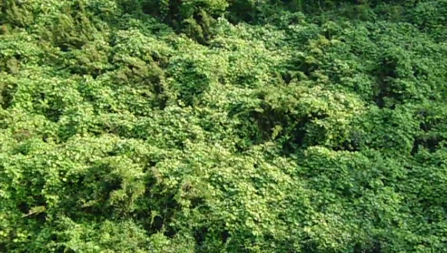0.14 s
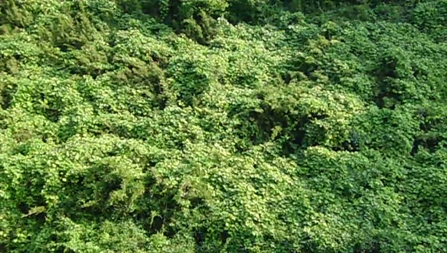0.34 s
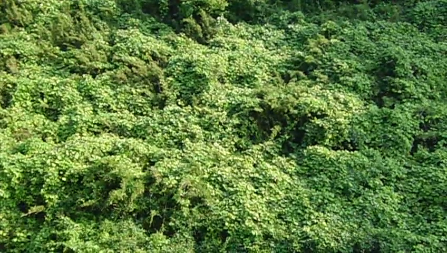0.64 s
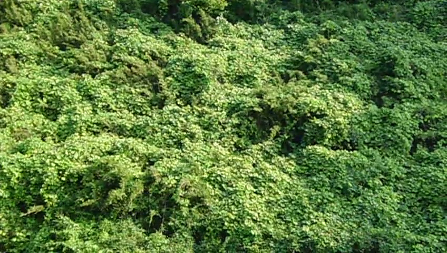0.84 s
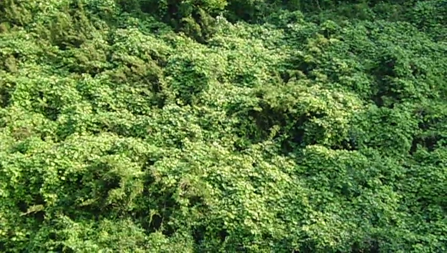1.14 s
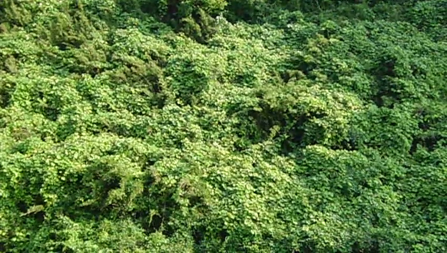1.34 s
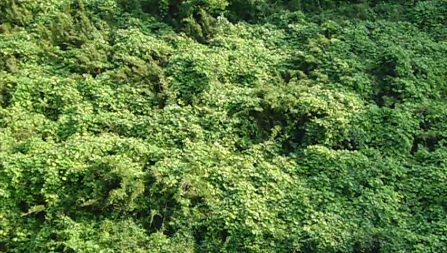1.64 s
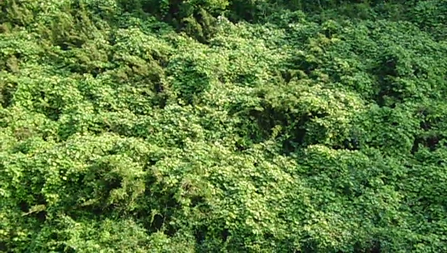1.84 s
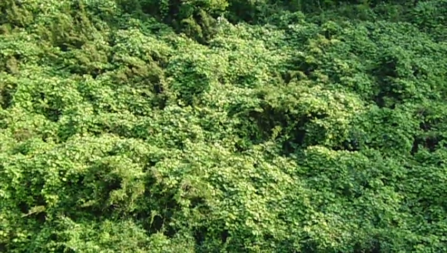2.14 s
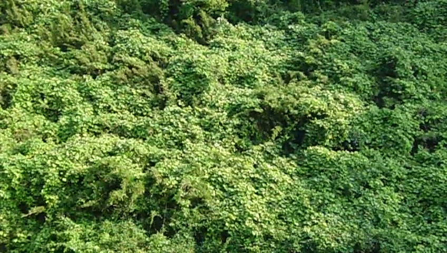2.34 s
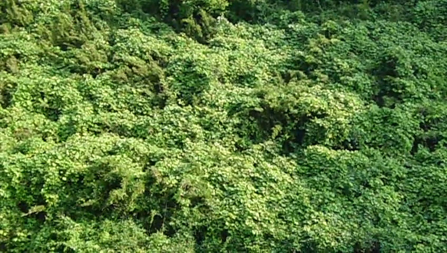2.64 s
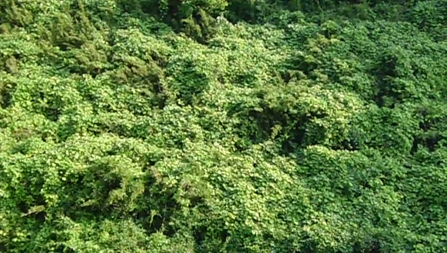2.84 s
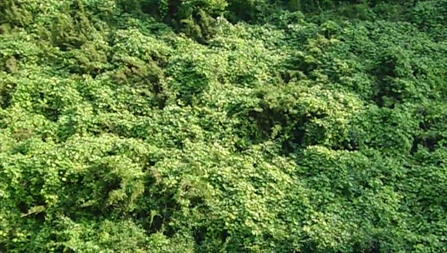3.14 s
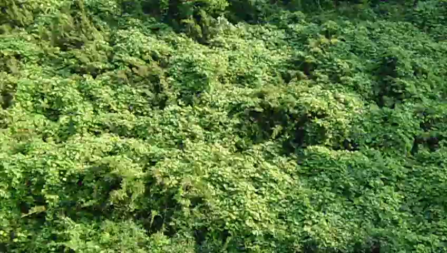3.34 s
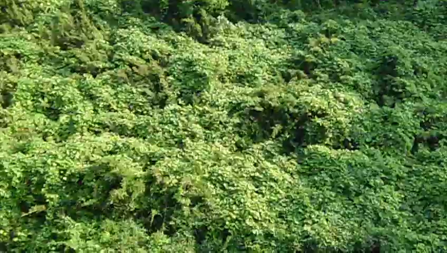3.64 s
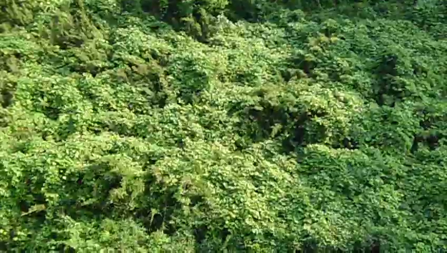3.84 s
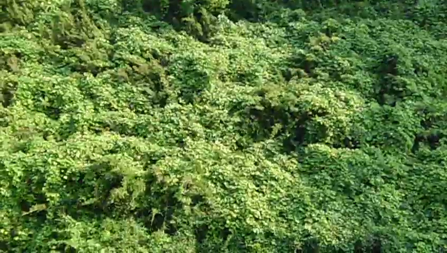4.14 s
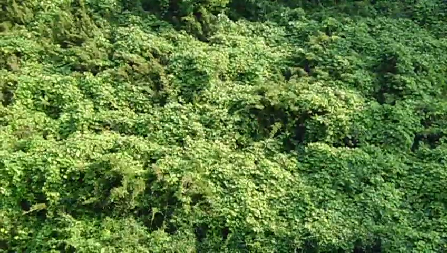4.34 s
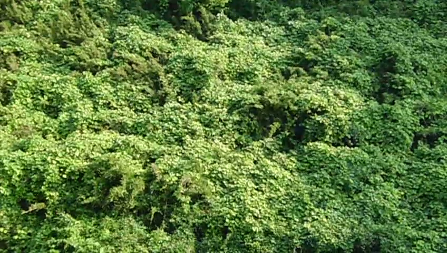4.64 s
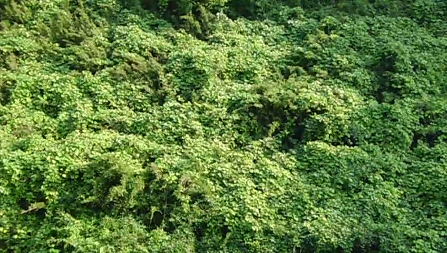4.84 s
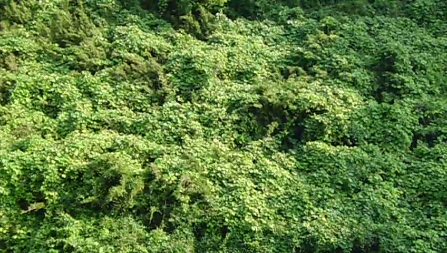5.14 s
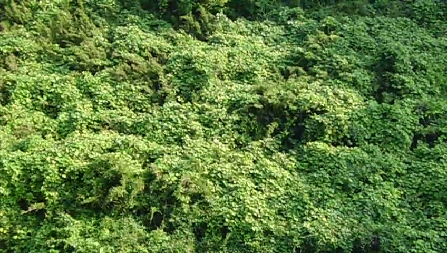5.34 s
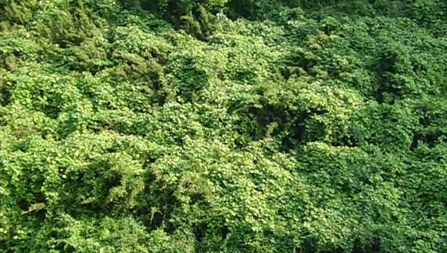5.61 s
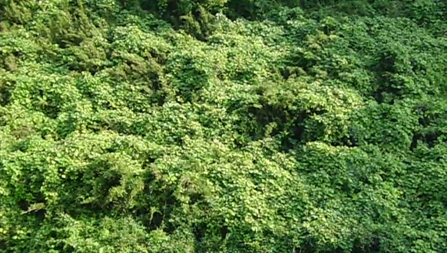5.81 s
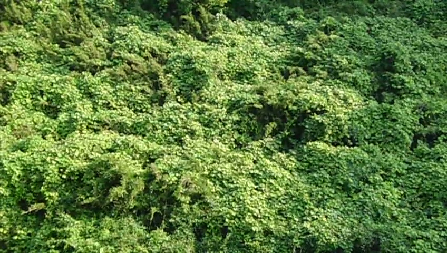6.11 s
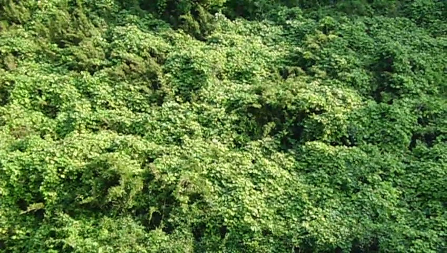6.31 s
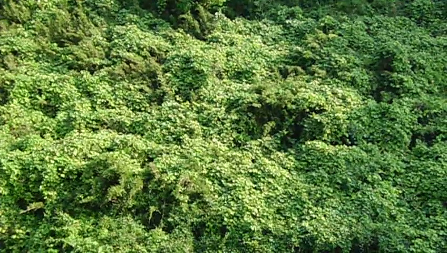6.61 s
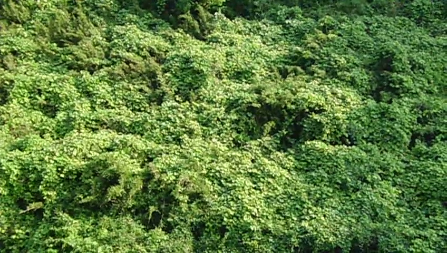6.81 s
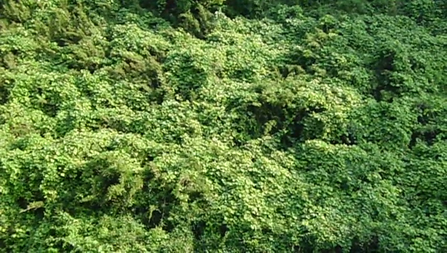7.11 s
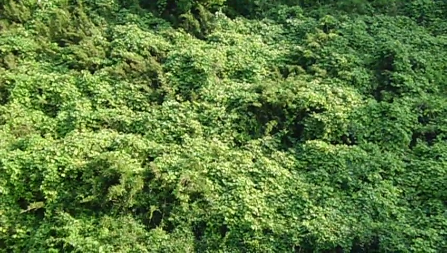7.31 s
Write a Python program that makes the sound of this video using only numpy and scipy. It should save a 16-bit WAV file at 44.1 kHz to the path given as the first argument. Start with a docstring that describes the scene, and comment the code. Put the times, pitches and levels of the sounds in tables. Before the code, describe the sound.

Many cicadas ring together from the start, high and metallic, with a hissing insect buzz shivering above them. Thin fuzzy whines join after two seconds, and two tiny dry ticks pass. Midway one bird gives a soft, held whistle ending in a sharp flick that rings along the leafy slope. The chorus then thins and grows more distant. Quiet mono outdoor pickup, with faint wind rumble below.

```python
"""Evening cicadas on an overgrown hillside, from the first moment: click trains ringing as short tonal notes,
about eight a second, under a high insect buzz of noise throbbing 32 times a second. Thin fuzzy whines come in
from 2 s, with two dry damped ticks near 2.8 and 4.2 s. A warbler's sine whistle swells from 2.95 s and flicks
up and down at 3.7 s. The slope echoes cicadas and bird; wind noise and a swelling low drone lie beneath."""
import sys
import numpy as np
from scipy import signal
from scipy.fft import rfft, irfft, next_fast_len
from scipy.io import wavfile
from scipy.ndimage import uniform_filter1d, map_coordinates

SR = 44100
rng = np.random.default_rng(int(sys.argv[2]) if len(sys.argv) > 2 else 0)


def wav_record(signal):
    """Record a signal, one row per channel, as 16-bit PCM in the file named by sys.argv[1]."""
    frames = np.transpose(np.atleast_2d(signal))
    bounded = np.clip(frames, -1, 1)
    # unit amplitude maps onto the largest positive 16-bit level
    quanta = np.round(bounded * 32767).astype(np.int16)
    wavfile.write(sys.argv[1], SR, quanta)


N = 329427
T = np.arange(N) / SR  # seconds


def cicadas():
    """Clear notes carry some echo; distant singers arrive mostly as echo off the slope."""
    near = sing(near_notes(), column=1, rough=0.0014, sag=0.011, rasp_db=-17.0)
    far = sing(far_notes(), column=2, rough=0.0038, sag=0.011, rasp_db=-17.5)
    near_mix = near + amp(-8.5) * slope(near, t60=0.61)
    far_mix = amp(-6) * far + amp(-4) * slope(far, t60=1.0)
    return (near_mix + far_mix)[SR:]  # drop the one-second lead-in


# Clear cicada notes, one pitch line per table, given by marker notes; some lines are further partials
# sounding in step with another line.
# Each row: note end in seconds, resonance in Hz, level in dB before scatter and swell.
NEAR_LINES = [
    [(.133, 4060, -63.5), (.608, 4055, -59.5), (.989, 4040, -57.5), (1.488, 4058, -57),
     (2.114, 4054, -57.5), (2.749, 4040, -56), (3.144, 4028, -54), (3.539, 4012, -57), (3.982, 4035, -58)],
    [(3.11, 4300, -72), (3.373, 4386, -63), (3.707, 4400, -58.5), (3.824, 4380, -63)],
    [(3.513, 4600, -70), (3.758, 4680, -63), (4.0, 4800, -76), (4.25, 4640, -72)],
    [(3.513, 4930, -69), (3.758, 5020, -67), (4.0, 5000, -68)],
    [(3.513, 4425, -64), (3.758, 4390, -64), (4.106, 4326, -54.5), (4.48, 4306, -60.5), (4.965, 4290, -59),
     (5.509, 4287, -60), (5.926, 4353, -61.5)],
    [(4.285, 4020, -60.5), (4.692, 4080, -67), (5.183, 4040, -72)],
    [(4.507, 4370, -65), (4.896, 4375, -62), (5.149, 4308, -62), (5.421, 4190, -68)],
    [(4.198, 3870, -72), (4.66, 3870, -68), (5.016, 3905, -65), (5.544, 3890, -69), (5.924, 3850, -66.5),
     (6.297, 3850, -72), (6.79, 3865, -73), (7.341, 3890, -69)],
    [(4.66, 3730, -75), (5.544, 3740, -70), (6.297, 3726, -74.5), (7.341, 3740, -77)],
    [(5.119, 4117, -75), (5.371, 4128, -68)],
    [(6.115, 4280, -64), (6.398, 4347, -67), (6.78, 4300, -76), (7.27, 4290, -75)],
    [(6.297, 3980, -77), (6.917, 4020, -72), (7.3, 3970, -76)],
]
NOTES_PER_S, NOTE_SCATTER_DB = 7.7, 0.56  # approximate pace; random level spread


def near_notes():
    """Each pitch line fills the time between marker notes evenly; rows are (end s, Hz, dB)."""
    lines = []
    for markers in NEAR_LINES:
        s, hz, db = np.transpose(markers)
        number = np.cumsum(np.round(np.diff(s, prepend=s[0]) * NOTES_PER_S))
        every = np.arange(number[-1] + 1)
        note_end = np.interp(every, number, s)
        note_hz = np.interp(every, number, hz)
        scatter_db = NOTE_SCATTER_DB * rng.standard_normal(len(every))
        note_db = np.interp(every, number, db) + scatter_db
        lines.append(np.transpose([note_end, note_hz, note_db]))
    return np.concatenate(lines)


# Distant phrases, before random spread, soft opening and the far mix gains.
# Each row: start in seconds, end in seconds, notes per second, opening and last pitch in Hz, level in dB.
FAR_SINGERS = [(-0.68, 3.2, 8.6, 4200, 3700, -71.5), (-0.67, .8, 8.85, 4800, 4140, -69.5),
               (-0.9, 1.56, 8.1, 4000, 4320, -66), (-.7, .7, 8, 4150, 4100, -61.5),
               (0.65, 3.5, 8.2, 4420, 4380, -74.5), (0.77, 2.4, 6.9, 4230, 4100, -70),
               (2.5, 6.2, 8.9, 4300, 4240, -71), (2.5, 6.5, 7.5, 4404, 4100, -63.5),
               (3, 6.13, 8.6, 4200, 4290, -62), (3, 5.75, 9, 4460, 4370, -60),
               (3.5, 6.8, 7.7, 4130, 4060, -58.5), (3, 7.2, 8.86, 3930, 3850, -69),
               (3.5, 8.17, 7.8, 3780, 4000, -78.5), (4, 7.47, 7.5, 4350, 4260, -62),
               (5.5, 6.8, 7.6, 4400, 3830, -81), (6, 7.65, 7.7, 4000, 3800, -69.5),
               (4.2, 5.6, 8.2, 4970, 4930, -75)]


def far_notes():
    """Each phrase opens low and soft, glides to its last pitch and fades; rows are (end s, Hz, dB)."""
    rows = []
    for start, end, rate, first_hz, last_hz, db in list(FAR_SINGERS) * 2:  # two neighbours share each phrase
        chance = rng.standard_normal((40, 3))
        s = start + (np.arange(40) + rng.uniform()) / rate + .004 * chance[:, 0]
        progress = (s - start) / (end - start)
        opening = np.exp(-(s - start) / 0.14)
        detune = 1 + 0.00596 * rng.standard_normal()
        glide_hz = detune * (first_hz + (last_hz - first_hz) * progress)
        hz = glide_hz * (1 - 0.0261 * opening + 0.003 * chance[:, 1])
        level_db = db - 11 * opening - 7 * progress ** 3 + 2 * chance[:, 2]
        rows.append(np.transpose([s, hz, level_db])[progress < 1])
    return np.concatenate(rows)


# Tymbal clicks come at 1/16 of the belly resonance; their strengths before random spread.
# Each row: click harmonic number, near level in dB, far level in dB.
CLICK_HARMONICS = [(7, -27, -25), (8, -9.5, -10.5), (15, -14.5, -13), (16, 0, 0), (31, -22, -20),
                   (32, -15, -14), (17, -24, -22), (19, -32, -36), (21, -27, -36), (23, -15, -17),
                   (24, -9, -10.5)]
# Where the harmonics near half pitch ring strongest: best resonance in Hz, width in Hz, loss far from it in dB.
HALF_PITCH_RESONANCE = (4310, 220, 11.3)
# Noisy scrape in a note. Each row: frequency in Hz, relative density in dB per Hz.
RASP_COLOUR = [(3500, -35), (4500, -7.5), (5300, -2), (5900, 0), (6400, -1.5), (8000, -24)]
NOTE_S = .047


def sing(notes, column, rough, sag, rasp_db):
    """Every note is a click train, heard as its harmonics; it swells, sags in pitch and stops short."""
    end, hz, db = np.transpose(notes)[..., None]
    t = T[:round(NOTE_S * SR)]
    clicks = hz / 16 * (t - sag * (t * t / NOTE_S - t) / 2)  # clicks counted so far
    uneven = wobble(900, len(notes) * len(t)).reshape(len(notes), -1)
    clicks = clicks + rough * uneven
    chance = rng.standard_normal((len(notes), len(CLICK_HARMONICS), 2, 1))
    best_hz, width_hz, loss_db = HALF_PITCH_RESONANCE
    low_db = -loss_db * (1 - np.exp(-((hz - best_hz) / width_hz) ** 2))
    rasp = np.resize(coloured(rng.standard_normal(N), RASP_COLOUR), (len(notes), len(t)))
    tone = amp(rasp_db) * rasp  # the clicks also scrape
    for k, row in enumerate(CLICK_HARMONICS):
        order = round(row[0])
        spread_db = 1.5 * chance[:, k, 0] * (order != 16)
        level_db = row[column] + low_db * (order < 10) + spread_db
        tone = tone + amp(level_db) * np.sin(2 * np.pi * (order * clicks + chance[:, k, 1]))
    edges = np.clip(t / 0.0039, 0, 1) * np.clip((NOTE_S - t) / 0.003, 0, 1)
    swell = amp(6.7 * (t / NOTE_S - 0.82)) * edges
    sound = np.sqrt(2) * amp(db) * swell * tone
    # the output starts one second early, so echoes are already ringing at time zero
    at = np.round((end - NOTE_S + 1) * SR).astype(int) + np.arange(len(t))
    return np.bincount(at.ravel(), sound.ravel(), N + 2 * SR)[:SR + N]


# The high insects' buzz, before throbbing and patchiness.
# Each row: time in seconds, level in dB, peak-to-trough throb depth in dB.
BUZZ_LEVEL = [(0, -62, 7.5), (.5, -63.5, 6), (.9, -60.5, 9.5), (1.36, -62.5, 5.5), (2.3, -68, 8),
              (2.7, -67.5, 13.5), (3.8, -63, 8), (4.4, -63.5, 5), (4.5, -60, 5), (4.62, -61.5, 5),
              (4.67, -65, 10.5), (5.79, -63.5, 5.5), (5.83, -70, 9), (6.55, -68, 7), (6.7, -74, 7),
              (7.47, -71, 6)]
# Running count of throbs. Each row: time in seconds, throbs counted.
THROB_COUNT = [(0.0, -0.22), (2.4, 76.66), (3.6, 115.29), (4.8, 153.69), (7.47, 238.8)]
# Body of the buzz. Each row: frequency in Hz, relative density in dB per Hz.
BUZZ_COLOUR = [(6500, -36.5), (7800, -5), (8800, 2), (10300, -4.5), (11300, -14.5), (13000, -30.5),
               (16000, -47)]
# Far hiss. Each row: frequency in Hz, relative density in dB per Hz.
HISS_COLOUR = [(4500, -31), (5600, -14.5), (6200, -3.5), (7300, -3), (8400, 1), (9500, -8), (11000, -13),
               (13000, -31)]
HISS_DB = -66  # before a slight wobble
TOP_DB, TOP_GROWS = -82, 1.4  # top end at the mean buzz level; its swing in dB per dB of buzz
SHIMMER_END_S, SHIMMER_DB = 1.34, 3.5  # the top end is brighter until then


def buzz():
    """A nearly steady far hiss, and dense wing clicks squeezed into about 32 throbs a second."""
    level_db, depth_db = curves(BUZZ_LEVEL)
    top_db = TOP_DB + TOP_GROWS * (level_db - level_db.mean()) + SHIMMER_DB * (T < SHIMMER_END_S)
    turns = curves(THROB_COUNT)[0]
    beat = (.5 + .5 * np.cos(2 * np.pi * turns)) ** 1.46  # narrowed peaks
    gate = amp(depth_db * (beat - .5) + 0.28 * wobble(7.1) + 1.5 * wobble(4))
    clicks = rng.standard_normal((3, N)) * rng.exponential(1, (3, N)) ** .5  # spikier than plain noise
    body = amp(level_db) * coloured(clicks[0], BUZZ_COLOUR)
    top = amp(top_db) * coloured(clicks[1], [(9000, -43), (11500, -2), (15500, -3.0)])
    hiss = amp(HISS_DB + 0.43 * wobble(5.1)) * coloured(clicks[2], HISS_COLOUR)
    return patchy(gate * (body + top) + hiss, depth_db=1.4)


def patchy(x, depth_db):
    """Patches of random gain in time and frequency: many insects at many distances come and go."""
    z = signal.stft(x, nperseg=512)[2]
    field = uniform_filter1d(rng.standard_normal(z.shape), size=6, axis=0)
    field = uniform_filter1d(field, size=30, axis=1)
    return signal.istft(z * amp(depth_db * unit(field)), nperseg=512)[1][:N]


# Narrow fuzzy tones, most of them insects. Each row: start in seconds, end in seconds, first pitch in Hz,
# last pitch in Hz, fuzz in random knots per second (sets the width), level in dB before fading.
WHINE_LINES = [(3.3, 5.04, 5580, 5830, 70, -73.5), (2.7, 3.4, 5850, 5950, 50, -76),
               (4.45, 4.65, 4900, 4900, 200, -70), (2, 3.6, 6450, 6650, 80, -76),
               (5.3, 7.3, 6000, 5950, 70, -78), (5.8, 7.47, 8000, 7930, 60, -73),
               (3.3, 6.3, 8750, 8450, 450, -69), (2.9, 3.22, 225, 235, 30, -77),
               (6.44, 6.53, 8600, 8600, 400, -66)]


def whines():
    """Sines whose strength and phase wander at random, so each line is fuzzy; most slide slowly in pitch."""
    out = np.zeros(N)
    for start, end, first_hz, last_hz, fuzz, db in WHINE_LINES:
        hz = np.interp(T, [start, end], [first_hz, last_hz])
        phase = 2 * np.pi * np.cumsum(hz) / SR
        fuzzy = wobble(fuzz) * np.sin(phase) + wobble(fuzz) * np.cos(phase)
        out += amp(db) * fade(start, end, 0.33 * (end - start), 0.014) * unit(fuzzy)
    return out


# The held whistle, before its wobble. Each row: time in seconds, level in dB.
WHISTLE_SWELL = [(2.95, -89), (3.07, -74.5), (3.12, -84), (3.19, -73), (3.29, -82), (3.37, -64.5),
                 (3.41, -81), (3.5, -70), (3.56, -78), (3.61, -66), (3.65, -77), (3.68, -71), (3.77, -82)]
# The flick, one table a syllable, before smoothing. Each row: time in seconds, pitch in Hz, level in dB.
FLICK_SYLLABLES = [
    [(3.706, 1720, -73), (3.714, 1764, -59.5), (3.722, 1700, -58)],
    [(3.725, 1506, -59), (3.737, 1347, -59), (3.75, 1482, -58), (3.762, 1802, -60), (3.777, 1922, -48.5),
     (3.794, 1898, -70)],
    [(3.801, 1905, -65), (3.81, 1880, -59), (3.82, 1900, -56)],
    [(3.821, 2713, -58.5), (3.828, 2564, -50.5), (3.84, 2268, -49), (3.852, 1820, -58), (3.864, 1384, -62),
     (3.88, 1178, -66.5), (3.91, 1140, -76)],
]
HOLD_HZ = 927  # centre pitch at 3.4 s


def warbler():
    """A pure whistle: a low wavering held note, then a quick up-and-down flick that rings along the slope."""
    held_hz = HOLD_HZ + 20 * (T - 3.4) + 10 * wobble(25)
    held_level = amp(curves(WHISTLE_SWELL)[0] + 0.84 * wobble(40))
    held_edges = fade(WHISTLE_SWELL[0][0], WHISTLE_SWELL[-1][0], 0.014, 0.012)
    held = np.sqrt(2) * held_level * held_edges * np.sin(2 * np.pi * np.cumsum(held_hz) / SR)
    flick = np.zeros(N)
    for rows in FLICK_SYLLABLES:
        hz, db = uniform_filter1d(curves(rows), size=200)  # round the corners
        edges = fade(rows[0][0], rows[-1][0], 0.0014, 0.0035)
        flick += np.sqrt(2) * amp(db) * edges * np.sin(2 * np.pi * np.cumsum(hz) / SR)
    return held + flick + slope(amp(-10) * held + amp(-5.5) * flick, t60=0.67)


# Small dry ticks. Each row: time in seconds, pitch in Hz, peak level in dB, time to decay 60 dB in seconds.
TICK_LIST = [(2.812, 4900, -55, 0.017), (4.228, 1100, -49.5, 0.0055)]


def ticks():
    """Each tick is a quickly damped sine."""
    out, t = np.zeros(N), T[:400]
    for s, hz, db, t60 in TICK_LIST:
        out[round(s * SR):][:400] += amp(db - 60 * t / t60) * np.sin(2 * np.pi * hz * t)
    return out


# Wind and distant valley noise. Each row: frequency in Hz, relative density in dB per Hz.
AIR_COLOUR = [(10, 0), (30, 2), (55, 1), (110, -7), (250, -11.5), (420, -19.5), (1000, -19), (1600, -26.5),
              (3000, -29.5), (5000, -32), (16000, -38)]
# Swells of the drone. Each row: centre in seconds, half length in seconds, peak level in dB.
DRONE_SWELLS = [(.5, 1, -76.5), (3.01, 0.24, -71), (3.7, 0.18, -75.5), (5.8, 0.37, -80), (7.4, .5, -87)]


def air():
    """A gusty floor of shaped noise, with a narrow noise band as a faint low drone that swells now and then."""
    gusts = amp(-64 + 0.14 * wobble(1.89) + 0.54 * wobble(25))
    floor = gusts * coloured(rng.standard_normal(N), AIR_COLOUR)
    drone = coloured(rng.standard_normal(N), [(250, -35.0), (265, 1.0), (275, -2.5), (290, -35.5)])
    swells = sum(amp(db) * np.exp(-((T - s) / half) ** 2) for s, half, db in DRONE_SWELLS)
    return floor + swells * drone


def slope(x, t60, count=5):
    """Scattered echoes from the leafy slope: a few random echo patterns used in turn, a quarter second each."""
    t = T[:SR]
    tails = rng.standard_normal((count, SR)) * amp(-60 * t / t60) * (t > .008)
    turn = np.arange(len(x)) * 4 // SR % count  # which pattern each sample excites
    parts = x * (turn == np.arange(count)[:, None])
    echoes = signal.fftconvolve(parts, tails / np.linalg.norm(tails[0]), axes=1)
    return echoes[:, :len(x)].sum(axis=0)


def amp(db):
    """Decibels to gain."""
    return 10 ** (np.asarray(db) / 20)


def unit(x):
    """Scaled to rms 1."""
    return x / np.sqrt(np.mean(x ** 2) + 1e-20)


def curves(rows):
    """One value per sample for each column after the time."""
    s, *cols = np.transpose(rows)
    return [np.interp(T, s, c) for c in cols]


def wobble(rate, length=N):
    """A smooth random curve, rate knots a second."""
    knots = rng.standard_normal(int(length * rate / SR) + 4)
    return map_coordinates(knots, [np.arange(length) * rate / SR])


def coloured(x, points):
    """x through a (Hz, dB) spectrum, at rms 1."""
    m = next_fast_len(N + 8192)
    f, db = np.transpose(points)
    log_f = np.log(np.fft.rfftfreq(m, 1 / SR) + 1)
    gain = amp(np.interp(log_f, np.log(f + 1), db))
    return unit(irfft(rfft(x, m) * gain, m)[:N])


def fade(start, end, rise, fall):
    """A gate with soft edges; all times in seconds."""
    return np.clip((T - start) / rise, 0, 1) * np.clip((end - T) / fall, 0, 1)


def scene():
    """All sources in one channel."""
    return (cicadas() + buzz() + whines() + warbler() + ticks() + air())[None]


TOP_HZ, OFFSET = 15750, .00695  # band limit; constant offset in full-scale units


def record(dry):
    """The camera keeps nothing above its band limit and adds a small constant offset."""
    m = next_fast_len(N + 8192)
    kept = np.fft.rfftfreq(m, 1 / SR) < TOP_HZ
    return irfft(rfft(dry, m) * kept, m)[:, :N] + OFFSET


dry = scene()
out = record(dry)
wav_record(out)
```